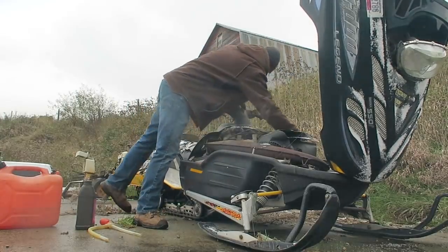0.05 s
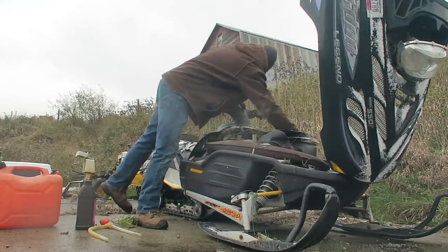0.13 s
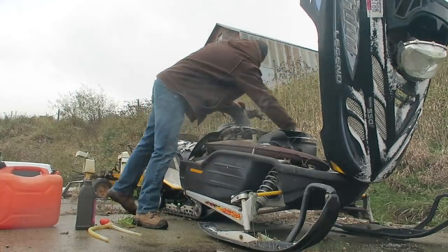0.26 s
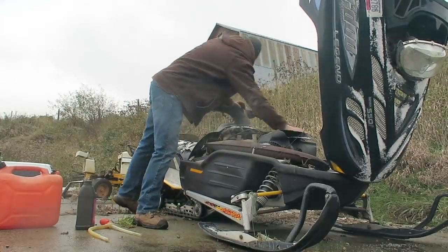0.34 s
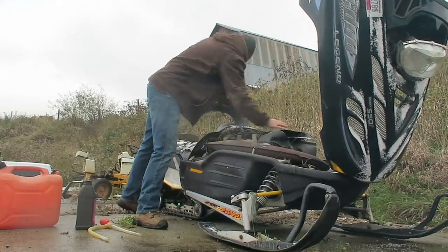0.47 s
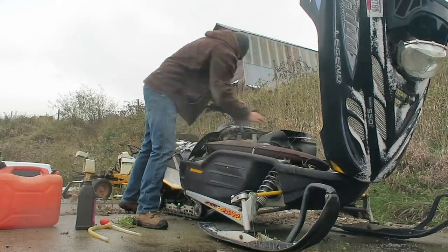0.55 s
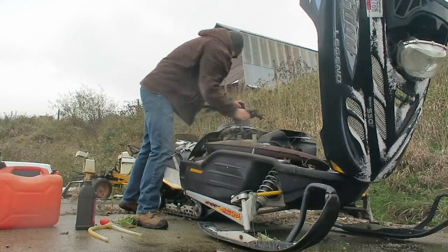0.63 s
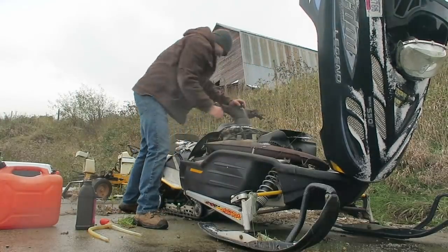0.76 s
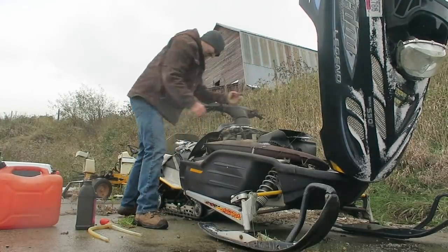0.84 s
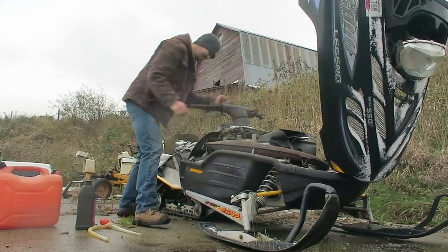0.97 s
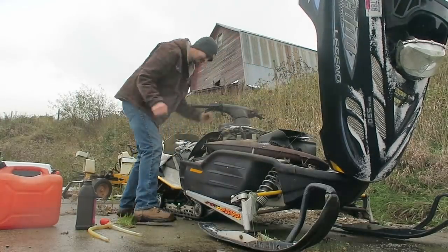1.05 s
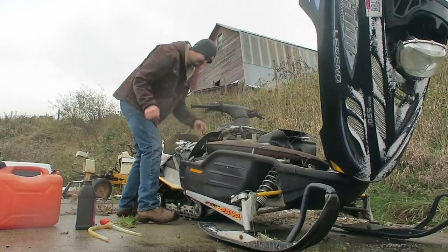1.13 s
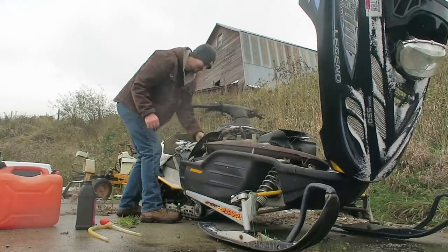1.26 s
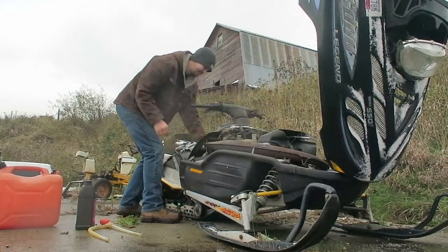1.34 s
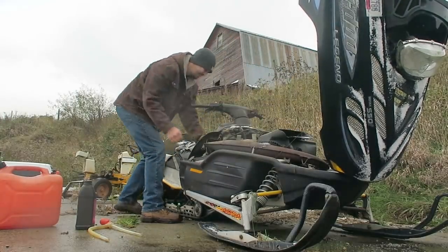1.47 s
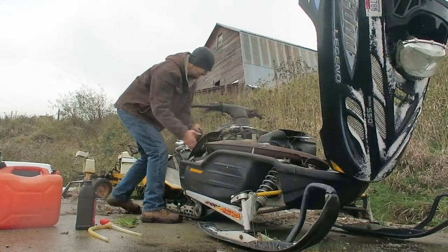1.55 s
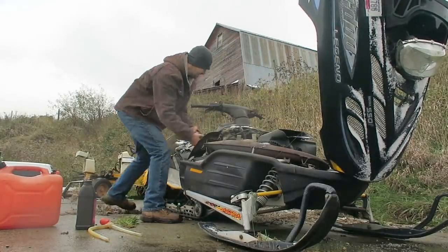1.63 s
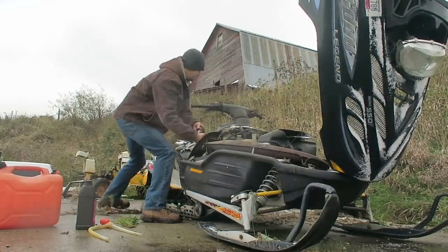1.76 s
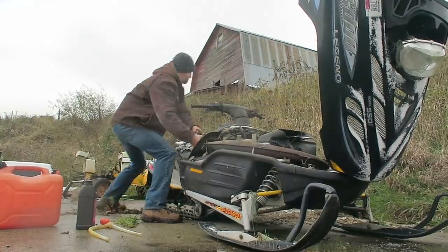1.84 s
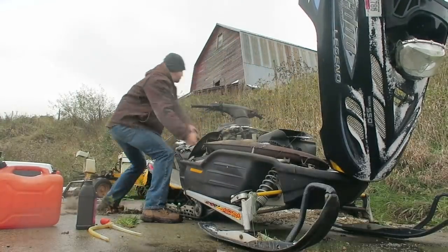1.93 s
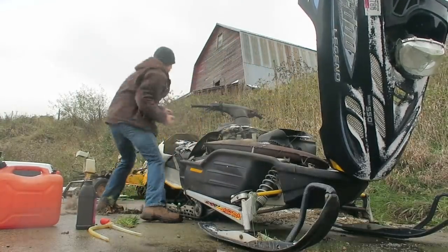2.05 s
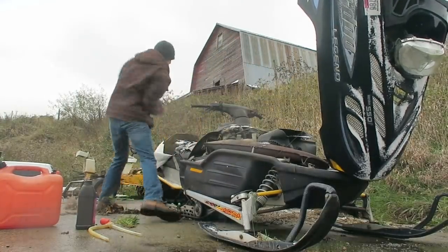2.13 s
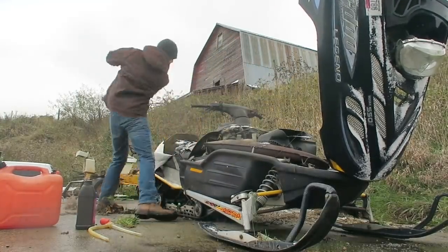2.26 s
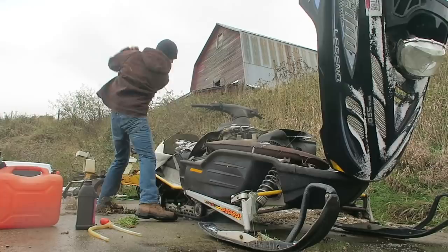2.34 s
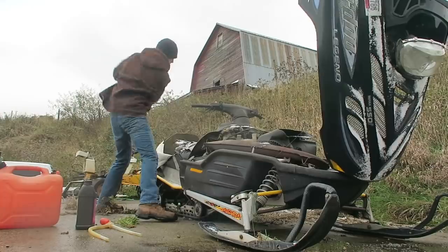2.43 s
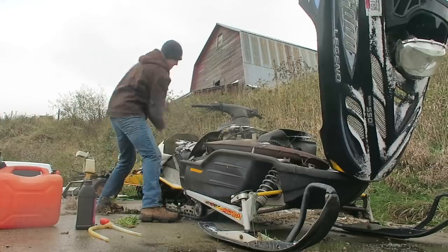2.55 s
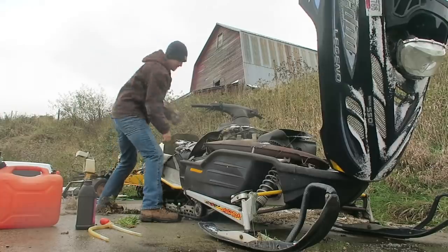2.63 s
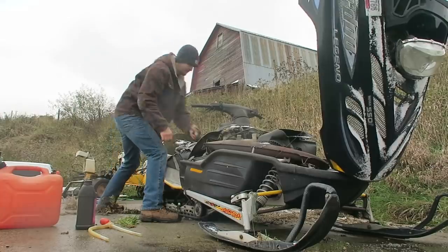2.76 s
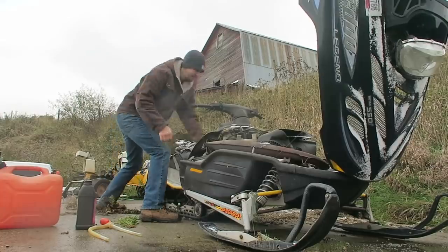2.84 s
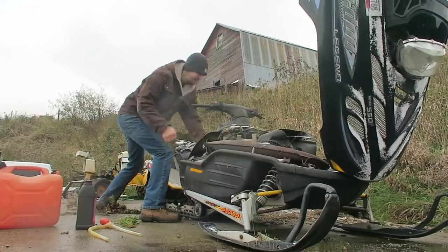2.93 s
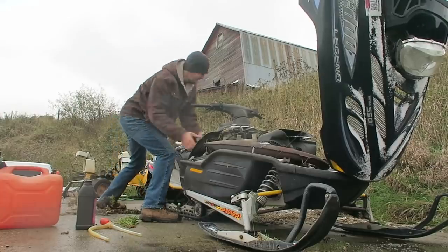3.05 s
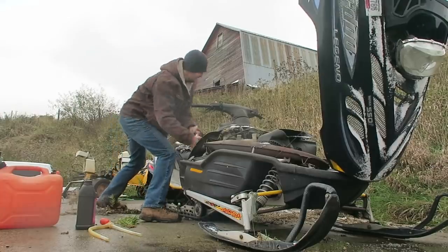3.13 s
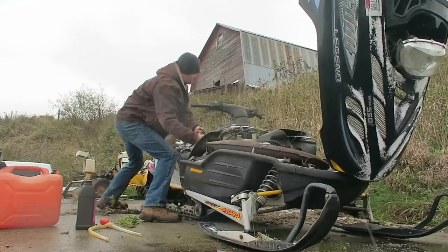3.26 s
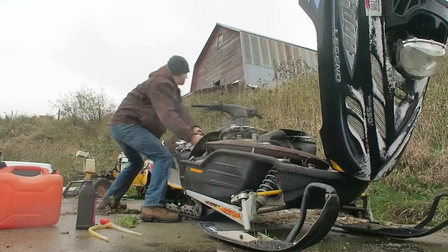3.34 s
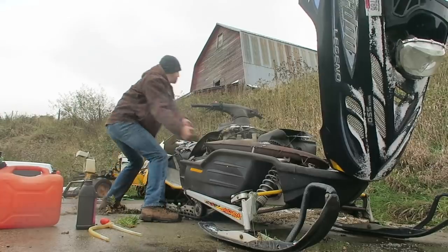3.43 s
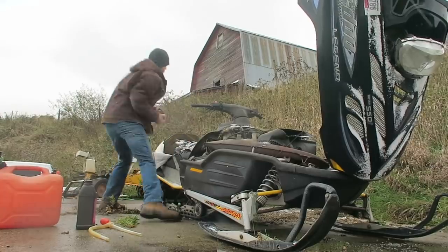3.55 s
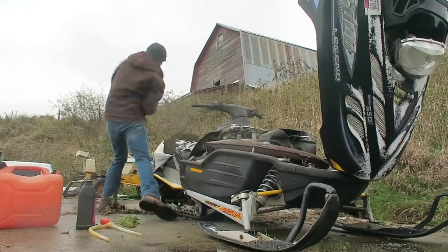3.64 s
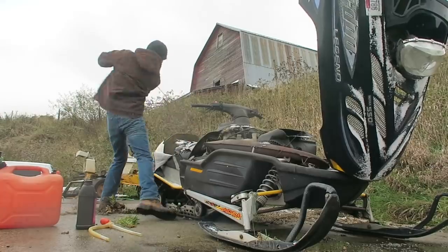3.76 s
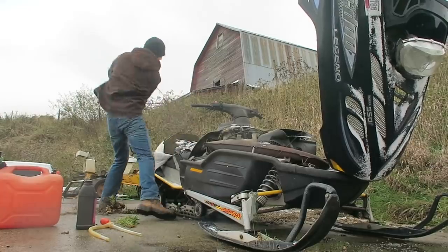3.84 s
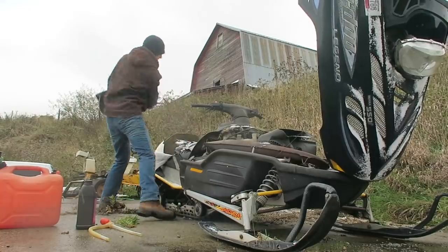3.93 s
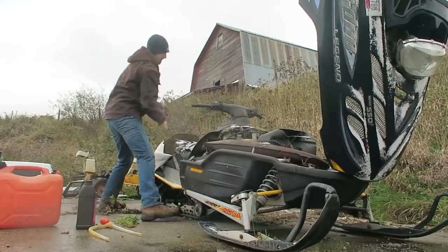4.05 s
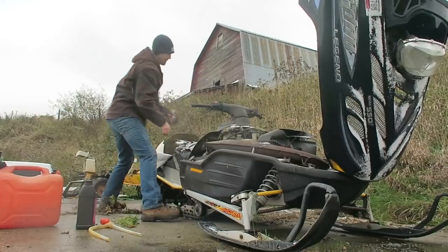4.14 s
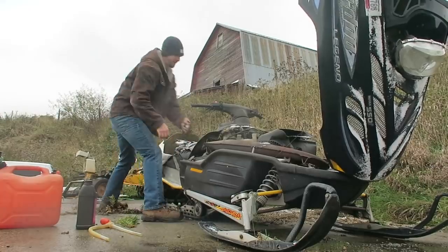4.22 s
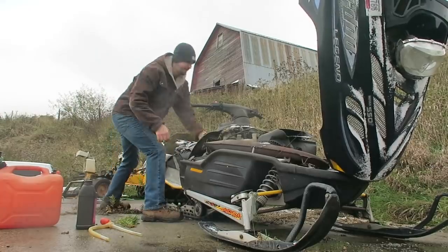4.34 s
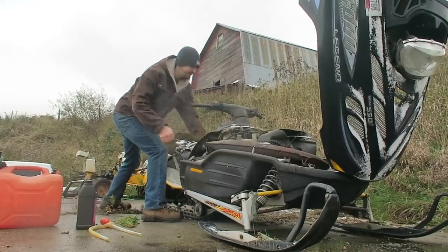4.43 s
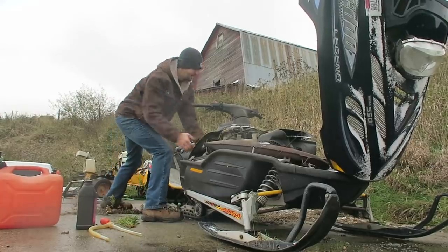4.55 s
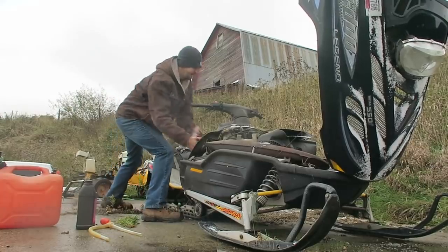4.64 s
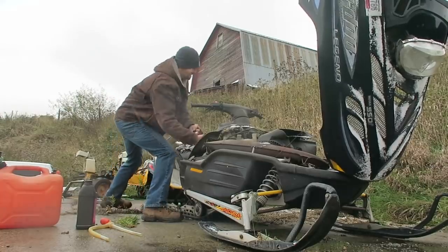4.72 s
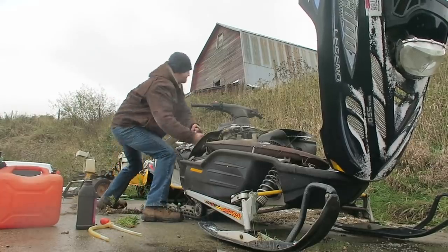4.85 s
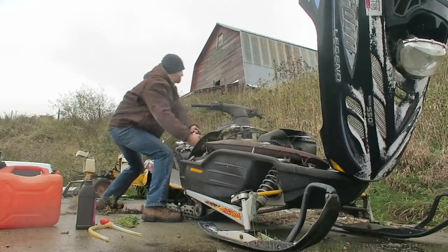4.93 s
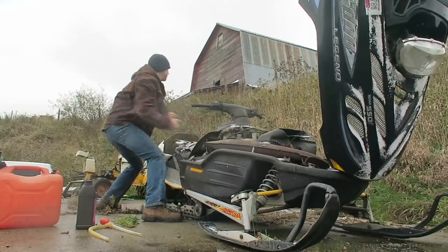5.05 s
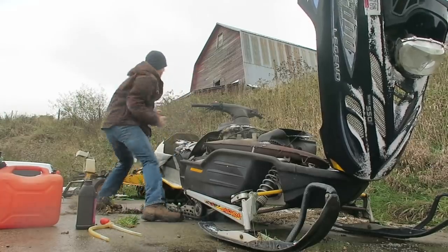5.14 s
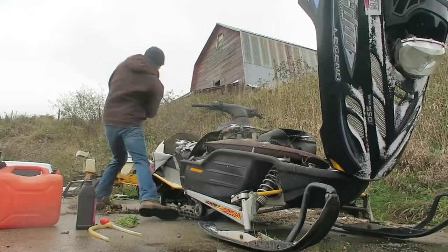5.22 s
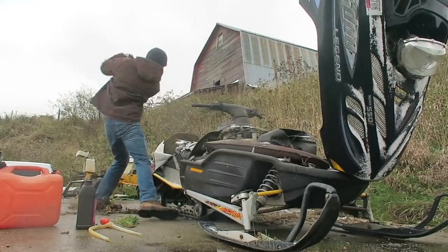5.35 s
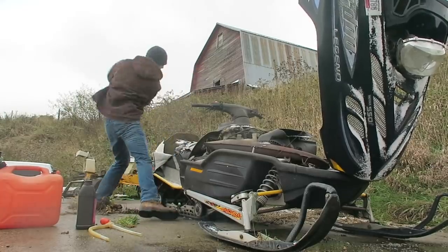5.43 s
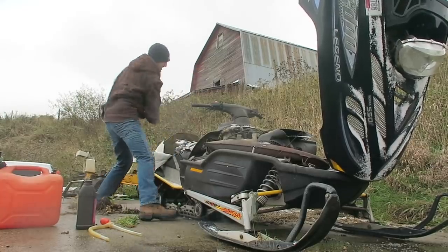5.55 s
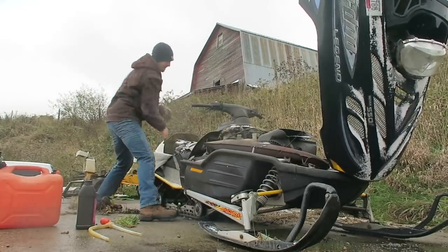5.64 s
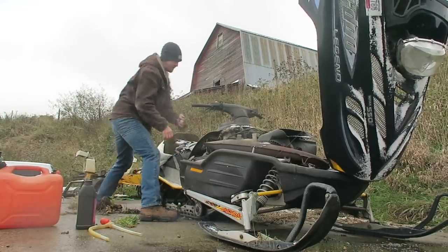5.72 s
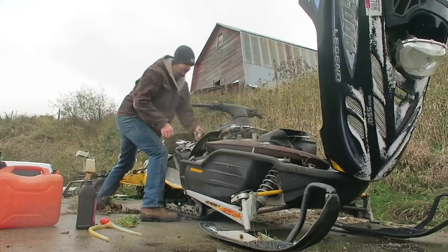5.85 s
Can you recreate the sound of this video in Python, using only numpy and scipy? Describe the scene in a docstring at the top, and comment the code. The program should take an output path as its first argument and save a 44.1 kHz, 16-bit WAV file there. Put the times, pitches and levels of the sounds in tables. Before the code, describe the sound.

Quiet wide outdoor wash with low gusty rumble throughout; the machine is close and centred, with short, faint echoes. From 0.3 to 1.4 s there are small latch clicks, soft low bumps of leaning weight, and boot thuds. Cloth rustles around 1.35 and 1.57 s as slack rope scrapes out, ending in a hollow pawl knock at 1.66. At 2.1 s a sharp rattle and biting haul: rough, whistling rope zip, rising then sagging, pulsed by about eight deep, soft exhaust puffs, quick at first, then slowing to rest by 2.55. The engine never fires. The rope whirs back from 2.5, pitch falling, and the handle slaps home near 3.0. Slack scrape and clunk at 3.1-3.2, second haul at 3.57 with slightly more puffs, rewind around 4.15, hard slap at 4.5. Slack and knock at 4.7, third haul at 5.15, clicks and a thud near 5.4, final rewind zipping from 5.5 to the end.

```python
"""A braided starter rope rubs and zips through its guide as a man pulls a snowmobile's starter three times.
He draws in slack until the pawls knock, then hauls; each compression of the two-stroke sends a low puff
through the exhaust, but it never fires. A spring winds the rope back and the handle slaps home.
Friction is coloured noise shaped by housing resonances, the whistle is a tone that follows rope speed,
knocks are decaying modes and noise; small parts, boots and jacket sound too, in an outdoor wash."""
import sys
import numpy as np
from scipy import signal
from scipy.fft import rfft, irfft, next_fast_len
from scipy.io import wavfile
from scipy.ndimage import uniform_filter1d

SR = 44100
rng = np.random.default_rng(int(sys.argv[2]) if len(sys.argv) > 2 else 0)


def log_audio(samples):
    """Write samples as a 16-bit WAV file to the path given in sys.argv[1]."""
    # one column per channel
    frames = np.atleast_2d(samples).T
    # limit to full scale, then quantise
    limited = np.clip(frames, -1, 1)
    pcm = np.round(limited * 32767).astype(np.int16)
    wavfile.write(sys.argv[1], SR, pcm)


N = 259550
TIME = np.arange(N) / SR

# outdoor wash, relative spectrum: [f/Hz, level/dB]
YARD = [(100, -6), (160, 2), (330, 0), (470, -2), (600, -4), (980, -0.5), (1300, -3), (1800, -3),
        (2050, -10), (2400, -13.5), (3200, -19), (5000, -26), (11500, -36.5), (15000, -66)]
# low rumble of the air, relative spectrum: [f/Hz, level/dB]
RUMBLE_COLOUR = [(15, -8), (30, -32.5), (55, 0), (88, 2.5), (110, -6), (160, -19), (300, -16), (800, -77)]
# swell of wash and rumble about their mean: [t/s, level/dB]
YARD_SWELL = [(0, 3), (1.0, 2.5), (1.85, -2), (3.35, -1), (4.9, 1), (5.89, -1)]
# stereo width of the wash: [f/Hz, relative side level/dB]
YARD_SIDE = [(60, -6), (110, -11), (200, 1.5), (380, 5), (700, -1), (1290, -7), (2380, -3), (4400, 3.5),
             (8120, 2), (15000, 5)]
YARD_DB, RUMBLE_DB = -41, -39.5  # levels before swell, gusts and side signal

# rattles of latch, pawls and rope guide: [t/s, relative level/dB, ring t60/s, treble above middle/dB]
CLICKS = [(0.308, -34.5, .06, 3), (.425, -24, 0.027, 4), (0.848, -12.5, 0.11, -4.5),
          (.857, -14, 0.039, -16), (.868, -19.5, 0.033, 19), (.945, -22, .033, 2), (1.1107, -30, 0.027, 24),
          (1.261, -31, 0.11, -3), (1.3136, -11, 0.068, -1.5), (1.4406, -18, 0.028, 3),
          (1.7928, -32.5, 0.029, 9), (1.8707, -24, 0.02, 2), (1.9448, -42, 0.027, -14),
          (2.033, -12.5, 0.083, -15), (2.0873, 4, .049, 3), (2.0979, -1, 0.028, 7),
          (2.389, -10.5, 0.059, 6), (2.554, -11, 0.014, 13), (2.6426, -17, 0.07, 12),
          (3.8994, -9, 0.043, 3.5), (4.151, -12.5, 0.04, 18), (5.4347, -15, 0.036, 9),
          (5.471, -10.5, 0.086, 0.5), (5.554, -19, 0.022, 24), (5.7344, -23.5, 0.071, 19)]
# rattling parts, relative spectrum: [f/Hz, level/dB]
CLACK = [(200, 3), (800, 10.5), (2000, 1), (3800, 6.5), (6000, -2.5), (9000, -11.5), (12000, -15),
         (15000, -50)]
# resonances of the small rattling parts: [f/Hz, width/Hz, lift/dB]
CLINK = [(1105, 68, 9.5), (1470, 150, 7), (1996, 100, 9), (2560, 150, 7.5), (3730, 220, 2),
         (3800, 110, 2.5), (6300, 240, 11.5), (7870, 530, 5)]
# soft low bumps as he leans on the machine and steps back: [t/s, relative level/dB, f/Hz]
LEANS = [(0.373, -23.5, 110), (0.641, -19.5, 60.3), (.668, -20.5, 121), (0.731, -22, 60), (0.782, -22, 93)]
# boots on concrete and bumps against the body: [t/s, relative level/dB, t60/s]
BUMPS = [(0.851, -22, 0.069), (0.9993, -9.5, 0.029), (1.2606, -11.5, 0.067), (1.316, -19.5, 0.097),
         (1.539, -22, 0.39), (1.941, -17, 0.044), (2.095, -18, 0.039), (2.392, -11, 0.21),
         (3.089, -11.5, 0.13), (3.4148, -18.5, 0.054), (3.83, -14.5, 0.22), (3.9, -13.5, 0.27),
         (5.406, -11, 0.092), (5.472, -25, 0.073)]
# those dull landings, relative spectrum: [f/Hz, level/dB]
THUD = [(60, -12), (140, -1), (450, 0), (900, -2), (1300, -7), (2200, -17), (6000, -40), (15000, -65)]
# arm movements that rustle the jacket: [t/s, level/dB, half length/s]
GESTURES = [(0.933, -38.5, 0.11), (1.075, -36, 0.054), (1.345, -31.5, 0.11), (1.57, -26, 0.071),
            (1.746, -39, 0.16), (1.924, -36, 0.043), (3.064, -32.5, 0.044), (3.274, -43.5, .06),
            (3.428, -42, .06)]
# rubbing canvas, relative spectrum: [f/Hz, level/dB]
CLOTH = [(200, 12.5), (1000, -5.5), (2800, -5), (5000, -15), (8000, -22), (12000, -23.5), (15000, -40)]

# slack drawn out until the pawls hold:
# [start t/s, end t/s, relative friction level at end/dB, swell on the way/dB,
#  braid rate at end f/Hz, whistle relative to friction/dB]
TAKEUPS = [(1.455, 1.492, -36, -3.5, 1900, 1), (1.542, 1.658, -19.5, 4, 986, -2.5),
           (3.087, 3.196, -23.5, 5.5, 1098, -5), (4.638, 4.737, -25, 13.5, 982, -9)]
# resonances of the starter housing: [f/Hz, width/Hz, lift/dB]
HOUSING = [(430, 22, 4.5), (865, 41, 4), (1066, 41, 6), (1400, 68, 6), (1798, 530, 10), (2220, 300, 4.5),
           (2420, 93, 4), (3086, 31, 7.5), (3760, 45, 6), (4300, 50, 10.5), (4630, 55, 5), (5410, 77, 10),
           (6750, 56, -13.5), (7650, 120, 4.5)]
# rope friction, relative spectrum: [f/Hz, level/dB]
RUB = [(76, -14), (130, -3), (252, -5), (407, -3.5), (538, -8.5), (771, -9), (1460, -11.5), (2410, -3),
       (3670, -7.5), (5060, -23), (5590, -22), (8010, -36.5), (11700, -39.5), (15500, -63)]
# pawls taking hold or handle slapping home:
# [t/s, relative thud level/dB, thud f/Hz, relative crack level/dB, crack t60/s]
KNOCKS = [(1.6592, 1, 382, -13, 0.046), (2.97, -35, 536, -7, 0.093), (2.987, -5.5, 276, -3.5, 0.035),
          (2.996, -4, 456, -25, .04), (3.012, -5.5, 280, -39, .04), (3.09, -16, 418, -16, 0.014),
          (3.198, 2, 414, -17, 0.082), (4.497, -22, 545, -8.5, 0.025), (4.502, -1, 454, -3.5, 0.035),
          (4.512, -7.5, 260, -38, .04), (4.732, -3.5, 433, -24, 0.064)]
# plastic crack, relative spectrum: [f/Hz, level/dB]
CRACK = [(120, -35), (300, 7.5), (900, 1.5), (1400, -3.5), (2200, -0.5), (4200, -9.5), (7000, -19),
         (11500, -27.5), (15000, -47)]
# hollow bodywork, relative spectrum: [f/Hz, level/dB]
HOLLOW = [(90, -4), (180, 7), (280, -2), (600, -7.5), (950, -11.0), (2500, -58)]
# modes of the bodywork: [f/Hz, relative level/dB, t60/s]
BODY = [(215, -5, .17), (268, 0, .17), (345, -6, .12), (415, -4, .15), (480, -7, .1), (560, -7, .09),
        (646, -11, .11), (786, -9, .11), (885, -7, .1), (1070, -10, .14), (1770, -15, .12),
        (2400, -16, .12)]

# hauls on the rope:
# [first compression t/s, taut before that/s, relative friction level/dB, extra friction against it/dB,
#  time from there to top speed/s, unchecked braid rate at top speed f/Hz, further compressions driven by arm]
HAULS = [(2.108, 0.089, -22, 11, 0.13, 3620, 4), (3.572, .06, -22, 10, 0.15, 3750, 5),
         (5.152, .05, -21, 6, 0.16, 3804, 5)]
# last compressions as the crank coasts to rest: [time since the one before/s, level/dB]
COAST = [(.064, -7.5), (0.0754, -5.5), (.09, -14)]
# intervals under the arm: the first, the shortening per compression, and the shortest allowed
FIRST_GAP_S, QUICKEN_S, FAST_GAP_S = .0566, 0.00716, .0421
# shaking chassis, relative spectrum: [f/Hz, level/dB]
SHAKE = [(15, -20), (35, -26), (60, -2.5), (92, 0.5), (115, -2.5), (160, -9.5), (300, -50), (800, -90)]
# spring rewinds: [top speed t/s, handle home t/s, relative friction level/dB, braid rate at top speed f/Hz]
REWINDS = [(2.686, 2.987, -24, 2846), (4.153, 4.51, -26.5, 2450), (5.715, 5.998, -24, 2726)]

# decay of the outdoor echoes: [f/Hz, t60/s]
ECHO_T60 = [(100, 0.16), (400, 0.55), (2000, 0.17), (8000, 0.2)]
# gain of the machine's echoes at the sides: [f/Hz, level/dB]
ECHO_SIDE = [(150, -42), (350, -30), (700, -22.5), (2200, -27), (4500, -15.5), (8000, -11.5), (13000, -9)]
EDGE_HZ = 15795  # upper band limit


def amp(db):
    """Level in decibels converts to an amplitude ratio."""
    return 10 ** (np.asarray(db) / 20)


def unit(x):
    """Division by the root mean square normalizes a signal to rms 1."""
    return x / np.sqrt(np.mean(x ** 2) + 1e-20)


def read(points, hz):
    """Linear interpolation on a logarithmic frequency axis."""
    f, value = np.transpose(points)
    return np.interp(np.log(hz + 1), np.log(f + 1), value)


def colour(x, points):
    """Spectral shaping: each frequency component is scaled by a tabulated gain."""
    hz = np.fft.rfftfreq(x.shape[-1], 1 / SR)
    return irfft(rfft(x) * amp(read(points, hz)), x.shape[-1])


def noise(points, size=N):
    """White noise filtered to a given spectrum at rms 1."""
    white = rng.standard_normal(next_fast_len(size))
    return unit(colour(white, points)[:size])


def wander(hz, size=N):
    """Random fluctuation of rms 1, interpolated between hz independent values a second."""
    knots = rng.standard_normal(12000)
    return unit(np.interp(TIME[:size] * hz, np.arange(len(knots)), knots))


def add(mix, s, sound):
    """Superposition: a sound is summed into the mix from time s."""
    part = mix[max(round(s * SR), 0):][:len(sound)]
    part += sound[:len(part)]


def gate(s, start, end, fade):
    """Linear envelope: full from start to end, with a fade outside each edge."""
    return np.clip(1 + np.minimum(s - start, end - s) / fade, 0, 1)


def bell(t, width):
    """Gaussian hump of height 1 at t = 0, falling to 1/e at the given width."""
    return np.exp(-(t / width) ** 2)


def peaks(modes, hz):
    """Resonance: the lifts in dB of a set of bell-shaped response peaks add."""
    return sum(db / (1 + (2 * (hz - f) / width) ** 2) for f, width, db in modes)


def resonate(x, modes):
    """Resonant filtering: a set of modes selects frequencies of x, at rms 1."""
    size = next_fast_len(len(x))
    gain = amp(peaks(modes, np.fft.rfftfreq(size, 1 / SR)))
    return unit(irfft(rfft(x, size) * gain, size)[:len(x)])


def burst(points, t60, rise):
    """Impact noise: a coloured random signal rises quickly and decays exponentially."""
    t = TIME[:SR // 3]
    return noise(points, size=len(t)) * amp(-60 * t / t60) * (1 - np.exp(-t / rise))


def yard(side_db=-1.5, rumble_side_db=-7, gust_db=2.5):
    """Diffuse field: independent mid and side noise widen an outdoor wash and a low, gusty rumble of air."""
    above = signal.butter(4, 140, "high", fs=SR, output="sos")
    mid, side = (unit(signal.sosfilt(above, noise(YARD))) for _ in range(2))
    side = amp(side_db) * colour(side, YARD_SIDE)
    wash = amp(YARD_DB) * np.array([mid + side, mid - side])
    mid, side = noise(RUMBLE_COLOUR), amp(rumble_side_db) * noise(RUMBLE_COLOUR)
    gusts = amp(RUMBLE_DB + gust_db * wander(4.2))
    rumble = gusts * np.array([mid + side, mid - side])
    swell = amp(np.interp(TIME, *np.transpose(YARD_SWELL)))
    return swell * (wash + rumble)


def rattles(click_db=-4.5, ring_hz=2150, ring_width_hz=700, ring_db=9.5, tick_t60=0.0028):
    """Impact of small hard parts: a tick decays at once, and resonant chatter rings on."""
    out, t = np.zeros(N), TIME[:SR // 4]
    modes = CLINK + [(ring_hz, ring_width_hz, ring_db)]
    for s, db, t60, treble_db in CLICKS:
        chatter = resonate(noise(CLACK, size=len(t)), modes)
        clack = colour(chatter, [(1500, -treble_db / 2), (6000, treble_db / 2)])
        fall = amp(-60 * t / t60) + .5 * amp(-60 * t / tick_t60)
        rise = 1 - np.exp(-t / 0.00081)
        add(out, s, amp(db + click_db) * fall * rise * clack)
    return out


def scatter(x):
    """Sparse reflections off ground, hood and buildings, with frequency-dependent decay."""
    t = TIME[:SR // 2]
    present = (rng.random(len(t)) < 3000 / SR) * (t > .002)  # about 3000 echoes a second
    taps = rng.choice([-1., 1.], len(t)) * present
    hz, frames, z = signal.stft(taps, SR, nperseg=256)
    decay = amp(-60 * frames / read(ECHO_T60, hz)[:, None])
    tail = signal.istft(z * decay, SR, nperseg=256)[1]
    return signal.oaconvolve(x, tail / np.linalg.norm(tail))[:N]


def leans(t60=0.062):
    """Damped oscillation: his weight rocks the chassis briefly at a low frequency."""
    out, t = np.zeros(N), TIME[:SR // 6]
    rise = 2 * (1 - np.exp(-t / 0.0039))
    for s, db, hz in LEANS:
        add(out, s, amp(db - 60 * t / t60) * np.sin(2 * np.pi * hz * t) * rise)
    return out


def bumps(bump_db=-6.5):
    """Soft impact: boots and knees land with a dull burst, weak in the treble."""
    out = np.zeros(N)
    for s, db, t60 in BUMPS:
        add(out, s, amp(db + bump_db) * burst(THUD, t60, rise=0.0013))
    return out


def jacket(crinkle_db=3.5):
    """Friction noise: canvas rubs as the arms move, and each movement swells and fades."""
    motion = sum(amp(db) * bell(TIME - s, half) for s, db, half in GESTURES)
    return motion * unit(noise(CLOTH) * amp(crinkle_db * wander(250)))


def takeup(start, end, db, swell_db, end_hz, whistle_db, fade_s=0.014, start_share=0.72,
           drone_db=-1, fizz_db=-14):
    """Uniform acceleration: in a gentle draw the braid rate rises linearly."""
    s = np.arange(start - fade_s, end + fade_s, 1 / SR)
    way = np.clip((s - start) / (end - start), 0, 1)
    rub = db - swell_db * (1 - way)
    hz = end_hz * (start_share + (1 - start_share) * way)
    gains = amp([rub, rub + drone_db, rub + fizz_db, rub + whistle_db])
    return s[0], hz, gains * gate(s, start, end, fade_s)


def shimmer(x, patchy_db):
    """Varying coupling: resonances come and go as the rope changes length and contact."""
    z = signal.stft(x, nperseg=512, noverlap=384)[2]
    patches = uniform_filter1d(rng.standard_normal(z.shape), size=3, axis=0)  # across frequency
    patches = unit(uniform_filter1d(patches, size=9, axis=1))  # across time
    return signal.istft(z * amp(patchy_db * patches), nperseg=512, noverlap=384)[1][:len(x)]


def rope(moves, grain_db=1.0, flutter_db=2.0, drone_db=-0.5, rub_db=-4.0, fizz_db=-2.0):
    """Stick-slip friction: fibres catch and slip in the guide and shake the starter housing."""
    size = next_fast_len(N)
    hz = np.fft.rfftfreq(size, 1 / SR)
    slips = rng.standard_normal(N) * amp(grain_db * wander(1400) + flutter_db * wander(110))
    slips = shimmer(slips, patchy_db=3.0)
    friction = rfft(slips, size) * amp(read(RUB, hz) + peaks(HOUSING, hz))
    low = 1 / (1 + (hz / 1300) ** 8)
    high = 1 / (1 + (hz / 5000) ** 8)
    # rub in the middle band, drone below and fizz above, in the order of each run's gains
    bands = [(high - low, rub_db), (low, drone_db), (1 - high, fizz_db)]
    out = np.zeros(N)
    for k, (band, db) in enumerate(bands):
        power = np.zeros(N)
        for start, _, gains in moves:
            add(power, start, gains[k] ** 2)
        out += amp(db) * np.sqrt(power) * unit(irfft(friction * band, size)[:N])
    return out


def zips(moves, rough_db=4.5, octave_db=-15, level_db=-2.5):
    """Periodic excitation: the braid ticks through the guide in a rough whistle pitched by rope speed."""
    out = np.zeros(N)
    for start, hz, gains in moves:
        size = len(hz)
        jitter = 1 + .048 * wander(1500, size=size) + .013 * wander(70, size=size)
        turn = 2 * np.pi * np.cumsum(hz * jitter) / SR
        tone = np.sin(turn) + amp(octave_db) * np.sin(2 * turn)
        tone = tone * amp(rough_db * wander(301.2, size=size))
        tone = resonate(tone, HOUSING)  # it flares each time it crosses a resonance
        add(out, start, amp(level_db) * gains[-1] * tone)
    return out


def knocks(thud_t60=0.052, thud_rise=0.0013, upper_ratio=1.62, upper_db=-14, ring_db=-20,
           hollow_db=-9.5, hollow_t60=0.1):
    """Modal excitation: a stiff two-note thud and plastic crack set the hollow bodywork ringing."""
    out, t = np.zeros(N), TIME[:SR // 3]
    ring = sum(amp(db - 60 * t / t60) * np.sin(2 * np.pi * hz * t) for hz, db, t60 in BODY)
    envelope = amp(-60 * t / thud_t60) * (1 - np.exp(-t / thud_rise))
    for s, thud_db, hz, crack_db, crack_t60 in KNOCKS:
        turn = 2 * np.pi * hz * t
        thud = (np.sin(turn) + amp(upper_db) * np.sin(upper_ratio * turn)) * envelope
        hollow = burst(HOLLOW, hollow_t60, rise=0.0015)
        add(out, s, amp(thud_db) * (thud + amp(ring_db) * ring + amp(hollow_db) * hollow))
        add(out, s, amp(crack_db) * burst(CRACK, crack_t60, rise=0.00069))
    return out


def compressions(driven):
    """Crank kinematics: intervals from the first compression shorten under the arm, then lengthen in coasting."""
    hauled = np.maximum(FIRST_GAP_S - QUICKEN_S * np.arange(round(driven)), FAST_GAP_S)
    return np.cumsum(np.r_[0, hauled, [gap for gap, _ in COAST]])


def haul(catch, lead_s, db, bite_db, top_s, top_hz, driven, attack_db_per_s=300, gather_hz_per_s=11000,
         slow_hz=2280, speed_up_s=.11, slow_down_s=0.13, check=.16, check_lead_s=0.0158, check_s=0.011,
         bite_lead_s=0.009, bite_s=0.044, release_db_per_s=56, surge_db=2,
         drone_db=1, drone_sag_db_per_s=19, fizz_db=-6.5, fizz_speed_db=6,
         whistle_db=7, whistle_speed_db=4, whistle_attack_db_per_s=130, whistle_release_db_per_s=30):
    """Load reaction: the rope bites at the first compression, is checked at each later one, then goes slack."""
    beats = compressions(driven)
    t = np.arange(-3 * lead_s, beats[-1] + 0.076, 1 / SR)  # zero at the first compression
    early, past = np.maximum(-t - lead_s, 0), np.maximum(t - top_s, 0)
    slowing = np.maximum(1 - (past / slow_down_s) ** 2, -.5)
    speed = np.where(t < top_s, bell(t - top_s, speed_up_s), slowing)
    checks = sum(bell(t - beat + check_lead_s, check_s) * (1 - beat / beats[-1]) for beat in beats)
    hz = (slow_hz + (top_hz - slow_hz) * speed - gather_hz_per_s * early) * (1 - check * checks)
    grip = db - attack_db_per_s * early
    bite = bite_db * bell(t + bite_lead_s, bite_s)
    # the rope slips on as each compression gives
    surge = surge_db * sum(bell(t - beat, check_s) for beat in beats[1:])
    rub = grip + surge - release_db_per_s * past
    drone = grip + bite / 2 + drone_db - drone_sag_db_per_s * np.maximum(t, 0)
    fizz = rub + bite + fizz_db - fizz_speed_db * np.minimum(1 - speed, 1)
    whistle = rub + whistle_db - whistle_speed_db * (1 - speed)
    whistle += whistle_attack_db_per_s * np.minimum(t, 0) - whistle_release_db_per_s * past
    gains = amp([rub + bite, drone, fizz, whistle])
    return catch + t[0], hz, gains * signal.windows.tukey(len(t), .15)


def engine(swell=0.016, steep=2.05, overtone_db=-27, wall_delay=0.11, wall_db=-19, first_db=0.4,
           sag_db_per_s=21, slow_hz=68, fast_hz=75, rebound_s=0.038, rebound_db=-12, rebound_hz=75):
    """Pulsed flow: compressions boom through the exhaust; the last two rebound and a far wall reflects."""
    out, t = np.zeros(N), TIME[:SR // 6]
    shape = (t / swell * np.exp(1 - t / swell)) ** steep
    for catch, *_, driven in HAULS:
        beats = compressions(driven)
        speed = np.r_[0, FAST_GAP_S / np.diff(beats)]
        driven_db = first_db - sag_db_per_s * beats[:-len(COAST)]
        levels = np.r_[driven_db, [db for _, db in COAST]]
        pitches = slow_hz + (fast_hz - slow_hz) * speed ** 2
        puffs = list(zip(beats, levels, pitches))
        puffs += [(beat + rebound_s, rebound_db, rebound_hz) for beat in beats[-2:]]
        for s, db, hz in puffs:
            turn = 2 * np.pi * hz * t
            boom = amp(db) * shape * (np.sin(turn) + amp(overtone_db) * np.sin(2 * turn))
            add(out, catch + s, boom)
            add(out, catch + s + wall_delay, amp(wall_db) * boom)
    return out


def shudder(boom, settle=0.16, level_db=-14):
    """Energy storage: the chassis absorbs the engine's jolts and shakes on after them."""
    keep = np.exp(-1 / (settle * SR))
    energy = signal.lfilter([1 - keep], [1, -keep], boom ** 2)
    return amp(level_db) * np.sqrt(energy) * noise(SHAKE)


def rewind(top, home, db, top_hz, lead_s=.22, slow_hz=1660, speed_up_s=.105, slow_down_s=.155, full_s=0.059,
           attack_db_per_s=105, sag_db_per_s=5, drone_db=-2.5, fizz_db=-7, fizz_speed_db=5,
           whistle_db=7, whistle_speed_db=17, whistle_hold_s=.1, whistle_fade_db_per_s=60):
    """Spring recoil: the rope is snatched back, then slows exponentially until the handle is home."""
    t = np.arange(-lead_s, home - top, 1 / SR)  # zero at top speed
    speed = np.where(t < 0, np.maximum(1 + t / speed_up_s, 0), np.exp(-t / slow_down_s))
    hz = slow_hz + (top_hz - slow_hz) * speed
    rub = db + attack_db_per_s * np.minimum(t + full_s, 0) - sag_db_per_s * np.maximum(t, 0)
    fizz = rub + fizz_db - fizz_speed_db * (1 - speed)
    whistle = rub + whistle_db - whistle_speed_db * (1 - speed) ** 2
    whistle -= whistle_fade_db_per_s * np.maximum(t - whistle_hold_s, 0)
    gains = amp([rub, rub + drone_db, fizz, whistle])
    return top + t[0], hz, gains * signal.windows.tukey(len(t), .04)


def runs():
    """Rope motion: each run is (start t/s, braid rate f/Hz, gains of rub, housing drone, fizz and whistle)."""
    pulls = [haul(*row) for row in HAULS]
    returns = [rewind(*row) for row in REWINDS]
    return pulls + returns + [takeup(*row) for row in TAKEUPS]


def scene(wet_db=-15, near_wall_delay=.027, near_wall_db=-16, boom_side_db=-33):
    """Mid-side superposition: the machine stands straight ahead and its scattered echoes spread to the sides."""
    moves = runs()
    machine = rope(moves) + zips(moves) + knocks() + rattles() + bumps() + jacket()
    boom = engine()
    mid = machine + amp(wet_db) * scatter(machine) + boom + shudder(boom) + leans()
    add(mid, near_wall_delay, amp(near_wall_db) * machine)
    side = colour(scatter(machine), ECHO_SIDE)
    side += amp(boom_side_db) * scatter(boom)
    return np.array([mid + side, mid - side]) + yard()


def record(dry):
    """Saturation rounds off the loudest peaks at full scale; a low-pass filter then limits the band."""
    held = dry / (1 + dry ** 8) ** (1 / 8)
    lowpass = signal.firwin(511, EDGE_HZ, window=("kaiser", 9), fs=SR)
    return signal.oaconvolve(held, lowpass[None], "same")


dry = scene()
out = record(dry)
log_audio(out)
```